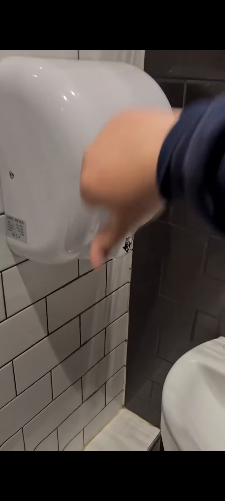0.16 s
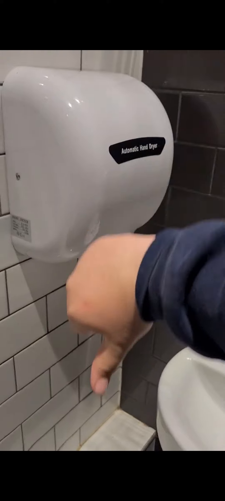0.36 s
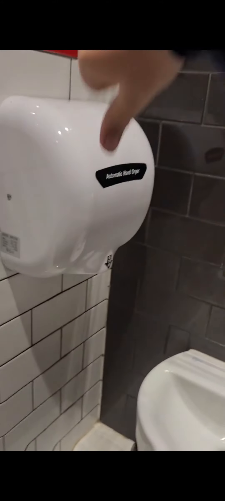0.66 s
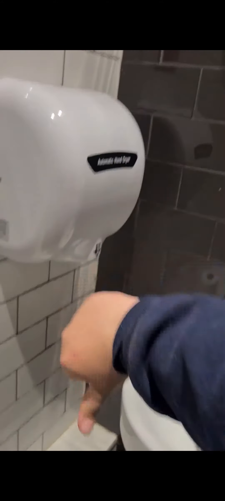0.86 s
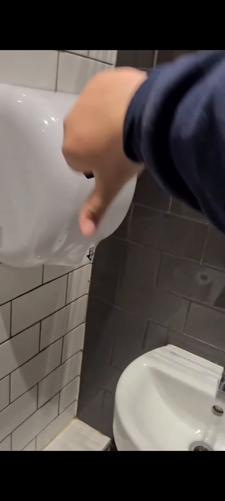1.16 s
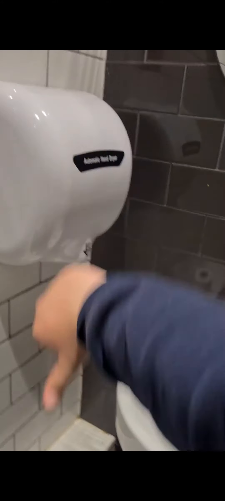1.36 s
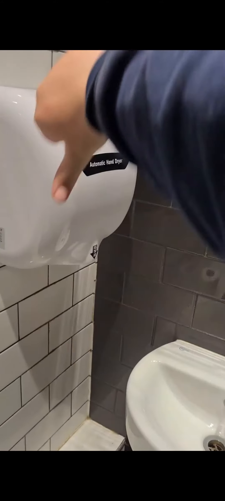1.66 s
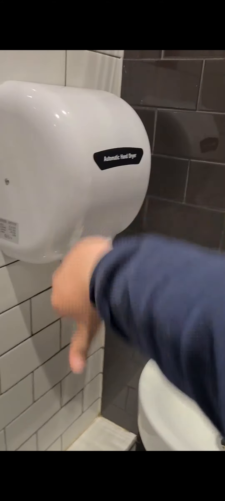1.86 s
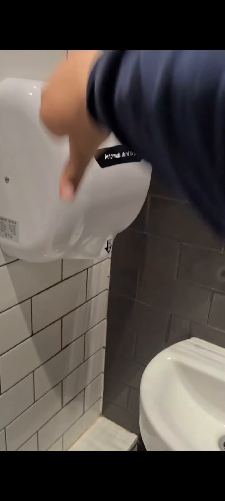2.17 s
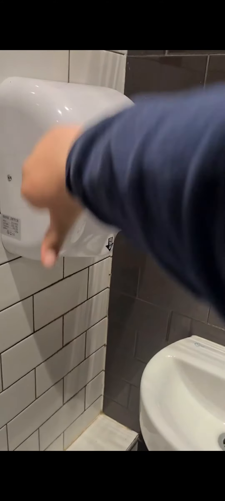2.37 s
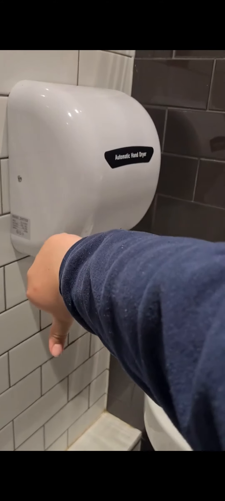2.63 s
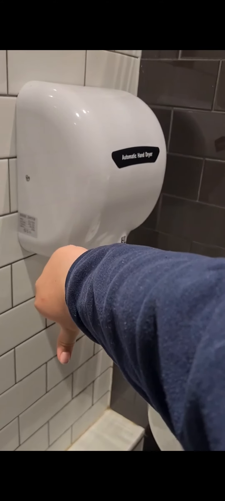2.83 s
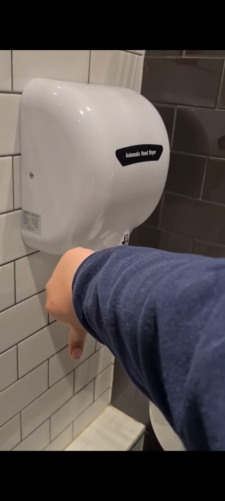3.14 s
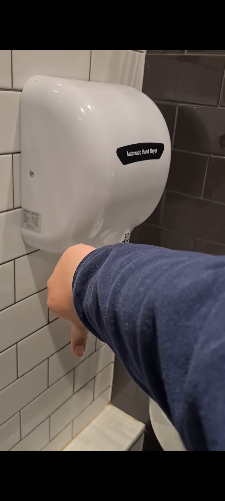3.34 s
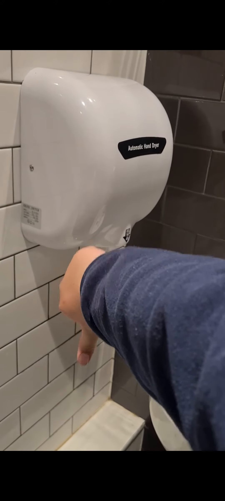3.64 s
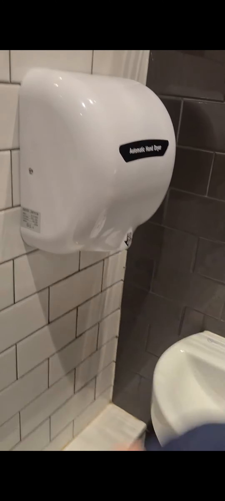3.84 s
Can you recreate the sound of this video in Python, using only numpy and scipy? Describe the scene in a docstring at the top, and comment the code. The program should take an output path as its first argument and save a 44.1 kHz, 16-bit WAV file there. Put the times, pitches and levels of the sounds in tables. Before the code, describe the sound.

A hand dryer blasts rushing air in a tiled restroom, then its motor cuts and winds down.

```python
"""Small tiled restroom, stereo microphones: a hand dryer blows while a hand waves under it, over a low room rumble.
At first the shaft runs up: rotor hum, mains hum, air noise, and fan and commutator whines through the housing.
After about three quarters of a second the motor cuts out; the whines glide down as the air dulls and fades.
Near the end come a soft decaying knock and one sharp click of noise. Sines make the tones, shaped noise the air;
the hum, whines and knock also come back off the tiles."""
import sys
import numpy as np
from scipy import signal
from scipy.fft import rfft, irfft, next_fast_len
from scipy.io import wavfile
from scipy.ndimage import map_coordinates

SR = 44100
rng = np.random.default_rng(int(sys.argv[2]) if len(sys.argv) > 2 else 0)


def wav_record(signal):
    """Record a signal, one row per channel, as 16-bit PCM in the file named by sys.argv[1]."""
    frames = np.transpose(np.atleast_2d(signal))
    bounded = np.clip(frames, -1, 1)
    # unit amplitude maps onto the largest positive 16-bit level
    quanta = np.round(bounded * 32767).astype(np.int16)
    wavfile.write(sys.argv[1], SR, quanta)


N = 176400  # samples, four seconds

# Colours and trims are relative. Every dB level before a colour or trim is a starting level.
# shaft speed, running up and then coasting: time_s, speed_turns_per_s
SHAFT_SPEED = [(0, 345), (.15, 365), (.3, 374), (.5, 382), (.79, 388), (1, 336), (1.25, 287), (1.5, 249),
               (2, 193), (2.5, 152), (3, 120), (3.5, 93.5), (4, 70.7)]

# hum at the shaft rate, and at its octave, before the trim: time_s, level_db
HUM_LEVEL = [(0.0, -30), (0.01, -30.5), (0.07, -40.5), (0.13, -29), (0.32, -22), (0.4, -35.5), (0.43, -28),
             (0.65, -26.5), (0.87, -29), (0.89, -40), (0.93, -22), (1.0, -23), (1.03, -37), (1.1, -29),
             (1.21, -25.5), (1.26, -37), (1.37, -19), (1.42, -28.5), (1.47, -23.5), (1.6, -24), (1.65, -33),
             (1.71, -25), (1.81, -65), (1.83, -36.5), (1.92, -44), (2.04, -31.5), (2.13, -45), (2.18, -35),
             (2.22, -30.5), (2.27, -37), (2.29, -47), (2.61, -37), (2.77, -59.5), (4.0, -77)]
OCTAVE_LEVEL = [(0.0, -57), (0.47, -55), (0.65, -56), (1.05, -44), (1.35, -44), (1.39, -49), (1.48, -32.5),
                (1.64, -30.5), (1.78, -38.5), (1.82, -26), (1.88, -30), (1.91, -38), (1.99, -36.5),
                (2.11, -33.5), (2.21, -45), (2.55, -42.5), (2.7, -56), (2.78, -40), (2.86, -57),
                (2.95, -42.5), (3.15, -41.5), (3.35, -74), (3.63, -48), (4.0, -70)]
HUM_TRIM_DB = 0.5
# weaker hum overtones, before fade and colour: order (multiple of the shaft rate), level_db
OVERTONES = [(3, -45), (4, -51.5), (5, -64)]
# the body's response to the overtones: pitch_hz, gain_db
OVERTONE_COLOUR = [(200, -13), (330, -9), (420, -5), (500, -5), (600, -6.5), (720, -12.5), (850, -6),
                   (1000, -18), (1130, -4), (1300, -5), (1600, -9)]
# turns per second; dB for each halving of the speed below that knee
OVERTONE_KNEE, OVERTONE_FADE_DB = 160, -4.5

# mains hum: pitch, level while powered, and when the power is cut
MAINS_HZ, MAINS_DB, CUT_S = 100.6, -46, 0.74

# blade whine before its colour: level at full speed, dB per tenfold speed, unsteadiness as a share of speed
BLADE_DB, BLADE_LAW_DB, BLADE_JITTER = -43, 40, .02
# how well the blade whine gets out: pitch_hz, gain_db
BLADE_COLOUR = [(700, -6), (1500, -10), (1950, 3), (2250, -2), (2700, -14), (2950, -3), (3150, 5),
                (3300, 0), (3460, 1), (4000, -2)]

# whine of the 22 commutator bars, before the housing:
# order (multiple of the shaft rate), level_db at 100 turns per second, slope_db per tenfold speed
WHINES = [(22, -63, -10), (44, -67, 30), (66, -68, 0), (88, -73, -15), (110, -79, 0), (132, -79, 0),
          (154, -81, 0), (176, -83, 0)]
# how well the housing passes that whine: pitch_hz, gain_db
WHINE_COLOUR = [(1500, -18), (1750, -12), (1880, -2), (1980, -5), (2100, 2), (2300, -11), (2550, -8),
                (2800, -12), (3080, -3), (3350, -15), (3900, -12), (4250, 2), (4600, -2), (4950, -9),
                (5350, 0), (5850, -5), (6350, 1), (6650, -3), (6950, 0), (7600, -7), (8500, -12),
                (12000, -8), (15000, 0)]
WHINE_JITTER = .011  # share of the speed
WHINE_DIRECT_DB, WHINE_ROOM_DB = -5, -0.5

# motor frame, rubbed by the brushes: pitch_hz, nominal width_hz, level_db at 100 turns per second
FRAME = [(1117, 41, -67), (3044, 150, -64.5), (4320, 180, -74), (4700, 110, -72)]
RUB_LAW_DB = 20  # per tenfold speed

# air noise before the trims: time_s, roar_db, rush_db, hiss_db
AIR_LEVEL = [(0.0, -39, -35.5, -41), (0.04, -41.5, -34.5, -38.5), (0.8, -37, -29, -34),
             (1.32, -40, -35, -41.5), (1.42, -41, -35.5, -43), (1.48, -40, -36, -44),
             (2.59, -43, -48.5, -62), (2.65, -47, -49, -64), (2.74, -47.5, -48.5, -66),
             (2.85, -47, -51.5, -69.5), (3.39, -49.5, -58.5, -76), (3.42, -54, -57, -73.5),
             (3.77, -51.5, -65.5, -80), (3.78, -54, -64, -79)]
ROAR_TRIM_DB, RUSH_TRIM_DB, HISS_TRIM_DB = 4, 1.5, 3
# air colours, the rush in strong and in dying flow: pitch_hz, density_db (per Hz)
ROAR_COLOUR = [(60, -13), (120, -16.5), (160, -3), (260, -8), (430, -3.5), (520, -3.5), (620, -3),
               (730, -6.5), (860, -9), (960, -21), (1300, -17.5), (3000, -85)]
FAST_RUSH_COLOUR = [(300, -41), (700, -4), (950, 0), (1250, 5), (1550, -3.5), (1950, 2.5), (2600, 0),
                    (3400, 1), (4000, -1.5), (5200, -3), (7000, -1.5), (8000, -13.5), (10000, -8.5),
                    (16000, -33)]
SLOW_RUSH_COLOUR = [(300, -23), (700, -16), (950, 1), (1250, -1), (1550, -2.5), (1950, -1), (2600, -3),
                    (3100, -1), (4000, -3), (5200, -3), (6000, -3.5), (7000, -3), (8000, -12),
                    (10000, -24.5), (16000, -37)]
HISS_COLOUR = [(3000, -32), (7000, 1), (8800, -3), (10500, -0.5), (12500, 3), (14500, 2), (16000, -6)]
# low buffeting of the air: pitch_hz, density_db (per Hz)
BUFFET_COLOUR = [(30, -14), (70, -1), (100, -1.5), (125, -5.5), (160, 3.5), (220, -1), (400, -1),
                 (1000, -58)]
BUFFET_DB, BUFFET_LAW_DB = -37, 61  # at full speed; per tenfold speed
# resonances of the dryer's housing, before a share is taken: pitch_hz, width_hz, lift_db
HOUSING = [(422, 110, 8), (609, 91, 6), (855, 34, 6), (1115, 27, 12.5), (1323, 29, 10), (1443, 59, 8.5),
           (1813, 250, 10.5), (2092, 166, 11), (3092, 48, 11.5), (3550, 92, 6.5), (4320, 130, 9),
           (4685, 250, 7), (5434, 190, 8), (6290, 150, 4.5), (6900, 300, 2)]
FAST_LIFT, SLOW_LIFT = 0.36, 1.09  # share of that lift in strong and in dying flow

# restroom rumble: pitch_hz, density_db (per Hz)
RUMBLE_COLOUR = [(20, 3), (45, 1), (70, 8.5), (100, -11), (150, 4), (400, -19), (700, -18), (1200, -33),
                 (4000, -22), (9000, -88), (16000, -33)]
RUMBLE_DB = -50

KNOCK_S, KNOCK_HZ, KNOCK_T60, KNOCK_DB = 3.366, 620, .02, -31  # start, pitch, seconds to fall 60 dB, peak

CLICK_S, CLICK_DB, CLICK_T60, CLICK_ROOM_DB = 3.8518, -29, 0.0074, -42.5  # T60 in seconds
# click colour: pitch_hz, density_db (per Hz)
CLICK_COLOUR = [(500, -15), (2000, -10), (3000, -8), (4500, -1.5), (7000, 4), (8500, -5.5), (12000, -8),
                (15500, -6)]

# decay off the tiles: pitch_hz, t60_s
TILE_DECAY = [(200, 0.71), (2000, 0.28), (6000, 0.12), (15000, 0.067)]
# likeness of the two microphones: pitch_hz, likeness (1 is identical)
ALIKE = [(60, .8), (170, .93), (300, .8), (480, .7), (740, 0), (2000, .03), (15000, .02)]
# balance of the two microphones: pitch_hz, left_minus_right_db before a 0.5 share goes to each side
BALANCE = [(60, -1), (92, 2), (140, -1.5), (210, -0.5), (330, -3), (500, -3.5), (770, -4.5), (1170, 0),
           (1790, -2.5), (2740, -1), (4190, -6.5), (6410, -4), (9810, 0), (15000, -9)]
TOP_HZ = 15950  # band limit


def amp(db):
    """Decibels to gain."""
    return 10 ** (np.asarray(db) / 20)


def unit(x):
    """Scale to rms 1."""
    return x / np.sqrt(np.mean(x ** 2) + 1e-20)


def along(points, hz):
    """Read (Hz, value) points on a log axis."""
    f, v = np.transpose(points)
    return np.interp(np.log(hz + 1), np.log(f + 1), v)


def curves(rows):
    """One value per sample for each column after the time."""
    s, *cols = np.transpose(rows)
    return [np.interp(np.arange(N) / SR, s, c) for c in cols]


def wobble(rate):
    """A smooth random curve, rate knots a second."""
    return map_coordinates(rng.standard_normal(2048), [np.arange(N) * rate / SR], mode="wrap")


def filtered(x, response):
    """x times a response of frequency."""
    m = next_fast_len(N + SR // 2)  # padded so the end does not wrap onto the start
    spectrum = rfft(x, m) * response(np.fft.rfftfreq(m, 1 / SR))
    return irfft(spectrum, m)[..., :N]


def spread(pair):
    """Make two unrelated signals as alike as the microphones hear them."""
    def mid_side_gains(hz):
        turn = np.arccos(np.clip(along(ALIKE, hz), -1, 1)) / 2
        return np.array([np.cos(turn), np.sin(turn)])

    mid, side = filtered(pair, mid_side_gains)
    return np.array([mid + side, mid - side])


def housing_db(hz):
    """Lift of the housing's resonances, in dB."""
    return sum(db / (1 + (2 * (hz - centre) / width) ** 2) for centre, width, db in HOUSING)


def noise(colour, lift=0):
    """Stereo noise of rms 1, with a share of the housing's lift."""
    pair = spread(rng.standard_normal((2, N)))
    return unit(filtered(pair, lambda hz: amp(along(colour, hz) + lift * housing_db(hz))))


def room(x):
    """The tiled walls answer with diffuse noise that decays at its own pace at each pitch."""
    hz, t, z = signal.stft(rng.standard_normal((2, SR // 2)), SR, nperseg=256)
    decay = amp(-60 * t / along(TILE_DECAY, hz)[:, None])
    tail = signal.istft(z * decay, SR, nperseg=256)[1]
    tail = tail / np.linalg.norm(tail[0])
    return spread(signal.fftconvolve(x[None], tail, axes=1)[:, :N])


def tone(angle, order):
    """A sine of rms 1 at a multiple of the given angle, from a random phase."""
    return np.sqrt(2) * np.sin(round(order) * angle + 2 * np.pi * rng.random())


def hum(speed, room_db=-21, overtone_room_db=-5, overtone_direct_db=-3):
    """The unbalanced rotor shakes the dryer once a turn, with a few overtones."""
    angle = 2 * np.pi * np.cumsum(speed) / SR
    fundamental = amp(curves(HUM_LEVEL)[0]) * tone(angle, order=1)
    octave = amp(curves(OCTAVE_LEVEL)[0]) * tone(angle, order=2)
    low = fundamental + octave
    upper = sum(amp(db + 2.25 * wobble(9)) * tone(angle, k) for k, db in OVERTONES)
    halvings = np.log2(np.maximum(OVERTONE_KNEE / speed, 1))
    upper = upper * amp(OVERTONE_FADE_DB * halvings)
    upper = filtered(upper, lambda hz: amp(along(OVERTONE_COLOUR, hz)))
    direct = amp(HUM_TRIM_DB) * low + amp(overtone_direct_db) * upper
    return direct + room(amp(room_db) * low + amp(overtone_room_db) * upper)


def mains(release_t60=0.62):
    """The windings hum steadily while powered and die away once the power is cut."""
    t = np.arange(N) / SR
    level_db = MAINS_DB - 60 * np.maximum(t - CUT_S, 0) / release_t60
    return amp(level_db) * tone(2 * np.pi * MAINS_HZ * t, order=1)


def blades(speed):
    """Nine fan blades chop the air into a rough whine, heard only off the tiles."""
    angle = 2 * np.pi * np.cumsum(speed * (1 + BLADE_JITTER * wobble(300))) / SR
    level_db = BLADE_DB + BLADE_LAW_DB * np.log10(speed / speed.max())
    line = amp(level_db) * tone(angle, order=9)
    return room(filtered(line, lambda hz: amp(along(BLADE_COLOUR, hz))))


def whine(speed):
    """The brushes sing on the commutator, unsteadily, through the housing and off the tiles."""
    angle = 2 * np.pi * np.cumsum(speed * (1 + WHINE_JITTER * wobble(200))) / SR
    decades = np.log10(speed) - 2  # from 100 turns per second
    lines = sum(amp(db + law * decades + 3.5 * wobble(20)) * tone(angle, k) for k, db, law in WHINES)
    sung = filtered(lines, lambda hz: amp(along(WHINE_COLOUR, hz)))
    return amp(WHINE_DIRECT_DB) * sung + amp(WHINE_ROOM_DB) * room(sung)


def rub(speed, swell_db=2.5):
    """The brushes rub and keep the frame ringing, each resonance swelling on its own."""
    def ring(centre, width):
        pair = rng.standard_normal((2, N))
        return unit(filtered(pair, lambda hz: 1 / (1 + (1.5 * (hz - centre) / width) ** 2)))

    rings = sum(amp(db + swell_db * wobble(10)) * ring(centre, width) for centre, width, db in FRAME)
    return amp(RUB_LAW_DB * (np.log10(speed) - 2)) * spread(rings)


def air(speed, flutter_db=0.39):
    """The jet roars, rushes and hisses; as it weakens the housing's resonances stand out in the rush."""
    roar_db, rush_db, hiss_db = curves(AIR_LEVEL)
    flow = speed / speed.max()
    flutter = flutter_db * wobble(14)  # shared by rush and hiss
    roar = amp(roar_db + ROAR_TRIM_DB + 0.98 * wobble(12)) * noise(ROAR_COLOUR, lift=1.0)
    fast = flow * noise(FAST_RUSH_COLOUR, FAST_LIFT)
    slow = np.sqrt(1 - flow ** 2) * noise(SLOW_RUSH_COLOUR, SLOW_LIFT)
    rush = amp(rush_db + RUSH_TRIM_DB + flutter) * (fast + slow)
    hiss = amp(hiss_db + HISS_TRIM_DB + flutter) * noise(HISS_COLOUR)
    buffet = amp(BUFFET_DB + BUFFET_LAW_DB * np.log10(flow)) * noise(BUFFET_COLOUR)
    return roar + rush + hiss + buffet


def rumble():
    """Steady coloured noise stands for the restroom's low rumble."""
    return amp(RUMBLE_DB) * noise(RUMBLE_COLOUR)


def knock():
    """A soft, dull knock: one quickly damped sine, direct and off the tiles."""
    t = np.maximum(np.arange(N) / SR - KNOCK_S, 0)
    ring = amp(KNOCK_DB - 60 * t / KNOCK_T60) * np.sin(2 * np.pi * KNOCK_HZ * t)
    return ring + amp(-4.5) * room(ring)


def click(tail_t60=0.25):
    """One sharp noise click, perhaps the dryer's relay, and its short diffuse tail off the tiles."""
    t = np.arange(N) / SR - CLICK_S

    def burst(db, t60):
        return (t >= 0) * amp(db - 60 * np.abs(t) / t60) * noise(CLICK_COLOUR)

    return burst(CLICK_DB, CLICK_T60) + burst(CLICK_ROOM_DB, tail_t60)


def scene():
    """Motor and air follow one shaft speed, over the restroom's low rumble."""
    speed, = curves(SHAFT_SPEED)
    motor = hum(speed) + mains() + blades(speed) + whine(speed) + rub(speed)
    return motor + air(speed) + rumble() + knock() + click()


def record(dry):
    """The right microphone hears a little more at most pitches; nothing is kept above the band limit."""
    def microphones(hz):
        balance_db = np.outer([.5, -.5], along(BALANCE, hz))
        return amp(balance_db) * (hz < TOP_HZ)

    return filtered(dry, microphones)


dry = scene()
out = record(dry)
wav_record(out)
```